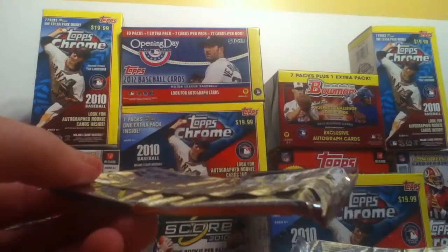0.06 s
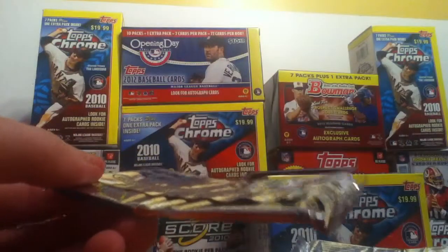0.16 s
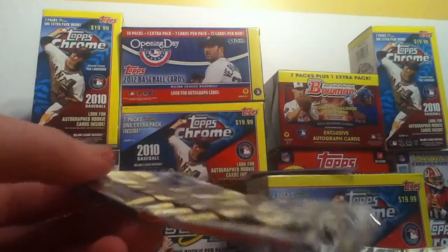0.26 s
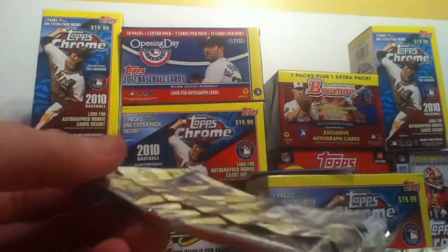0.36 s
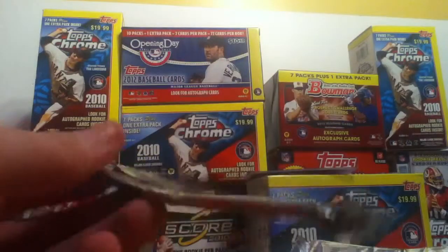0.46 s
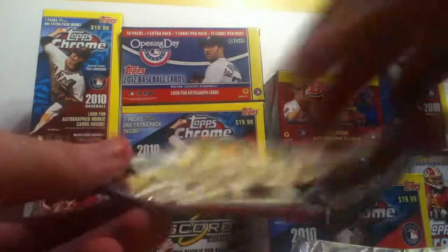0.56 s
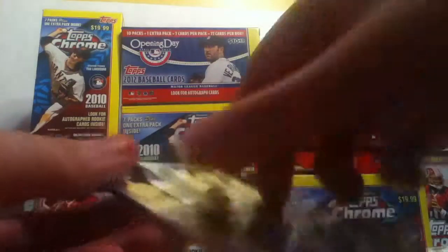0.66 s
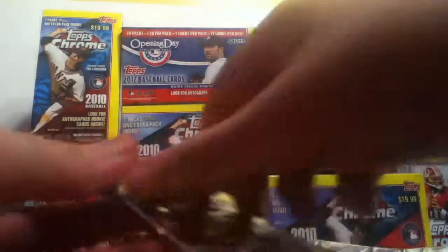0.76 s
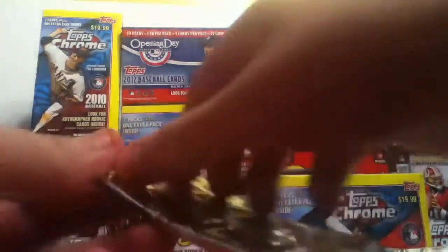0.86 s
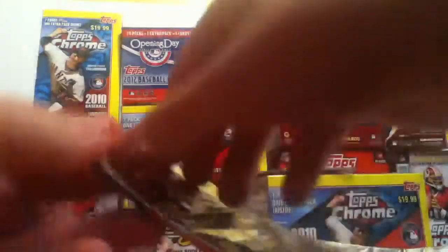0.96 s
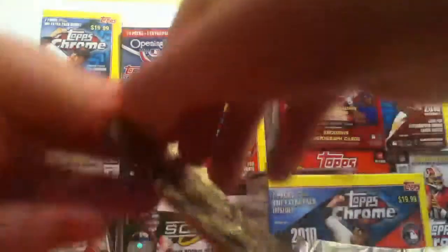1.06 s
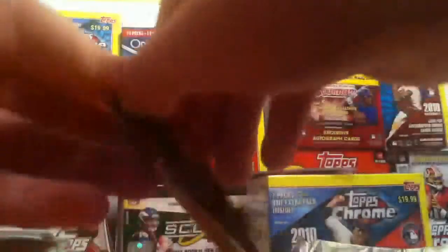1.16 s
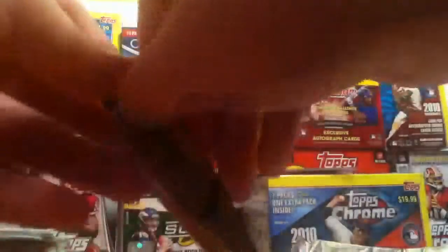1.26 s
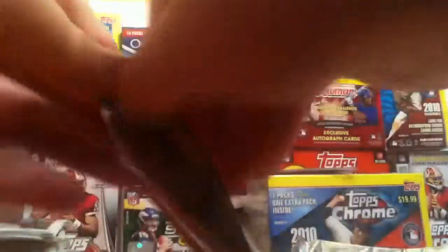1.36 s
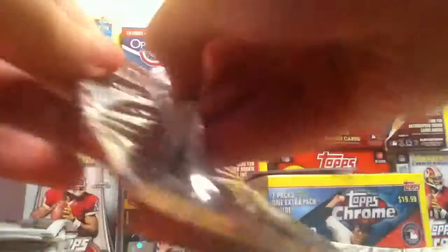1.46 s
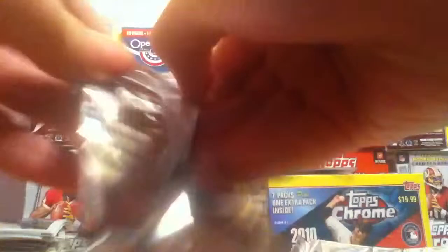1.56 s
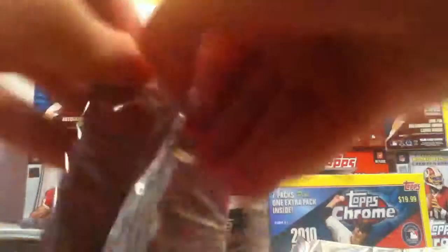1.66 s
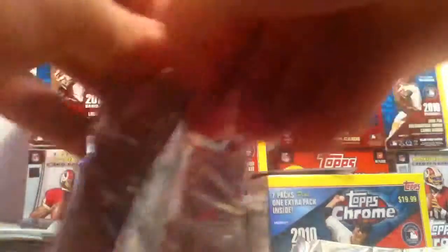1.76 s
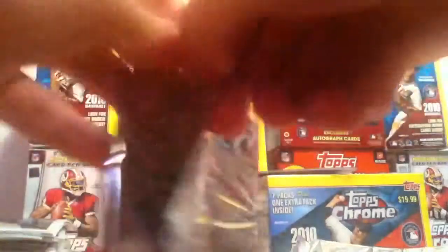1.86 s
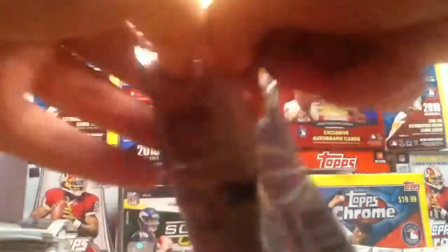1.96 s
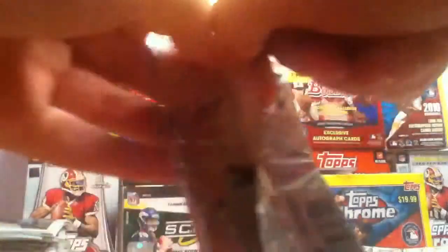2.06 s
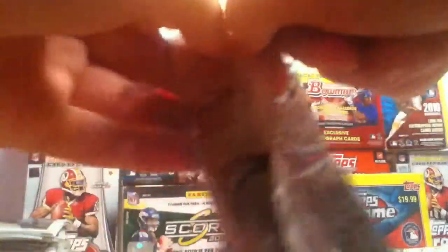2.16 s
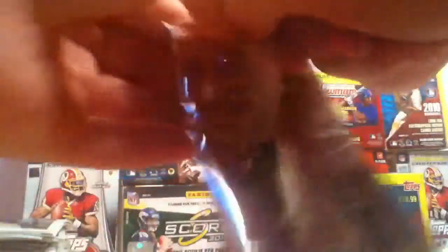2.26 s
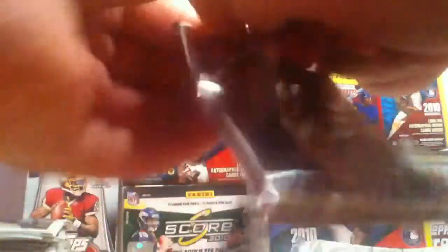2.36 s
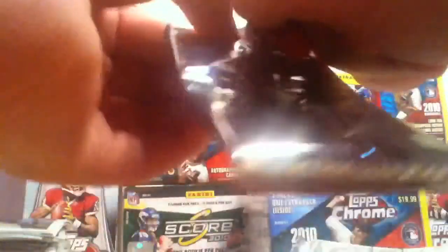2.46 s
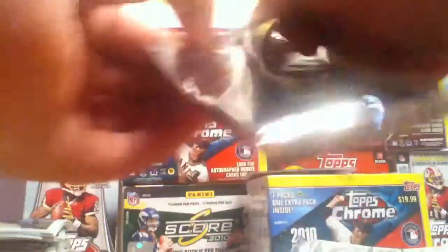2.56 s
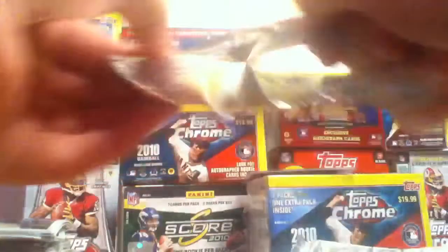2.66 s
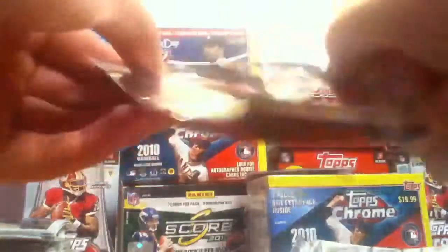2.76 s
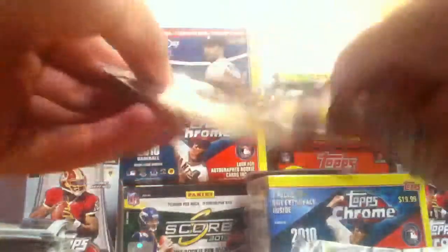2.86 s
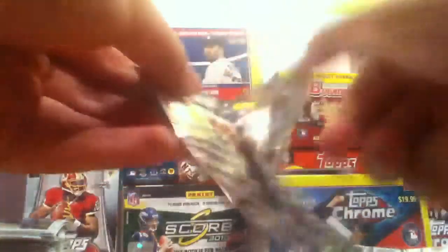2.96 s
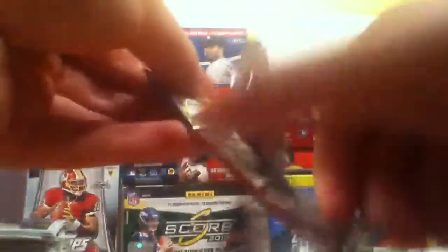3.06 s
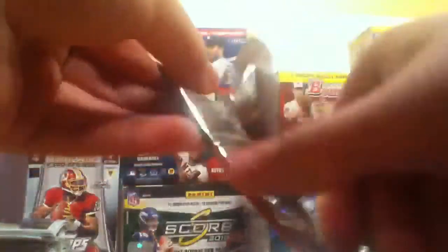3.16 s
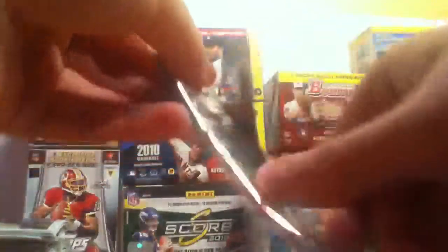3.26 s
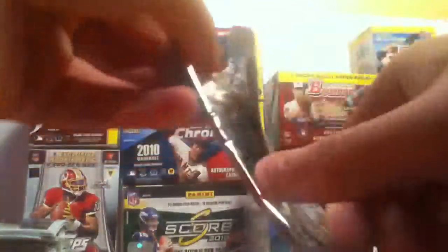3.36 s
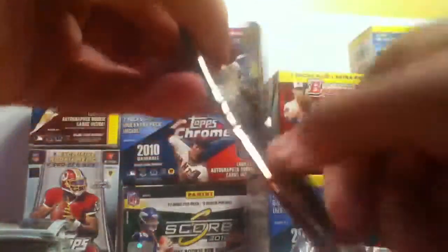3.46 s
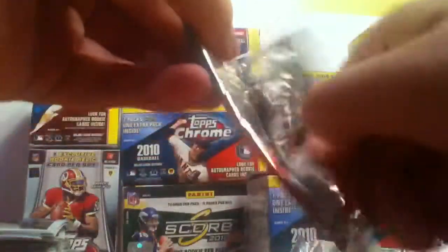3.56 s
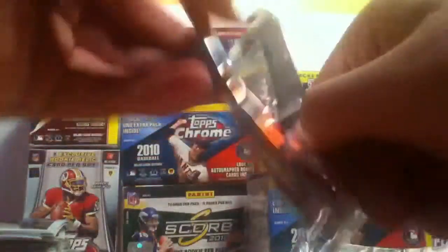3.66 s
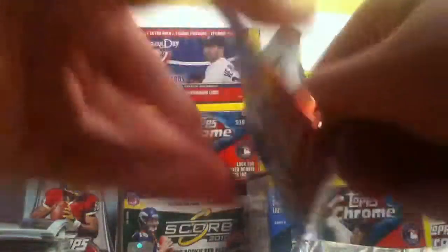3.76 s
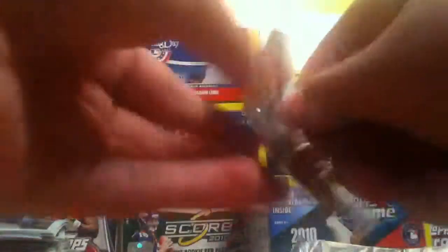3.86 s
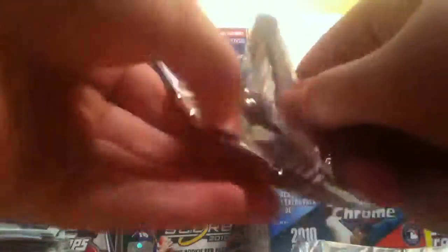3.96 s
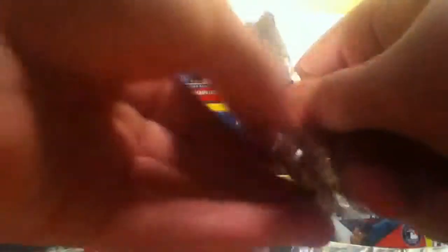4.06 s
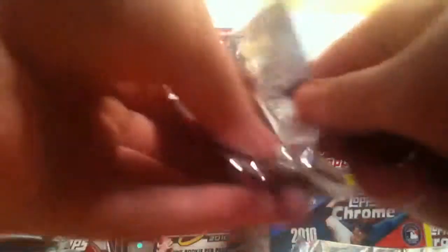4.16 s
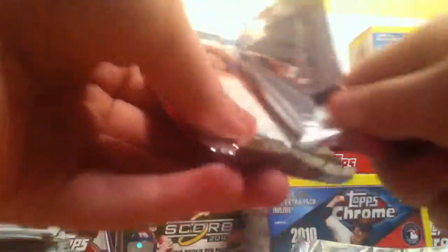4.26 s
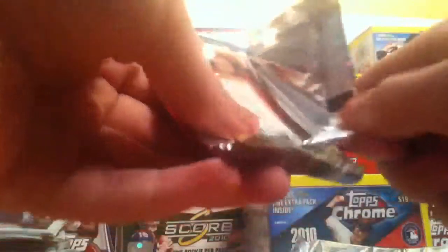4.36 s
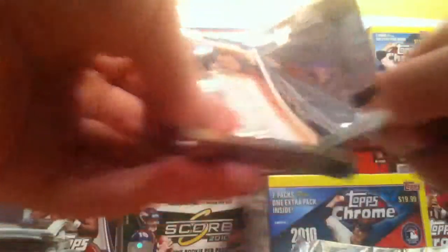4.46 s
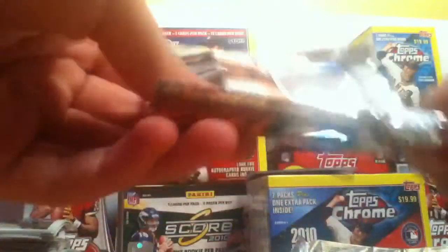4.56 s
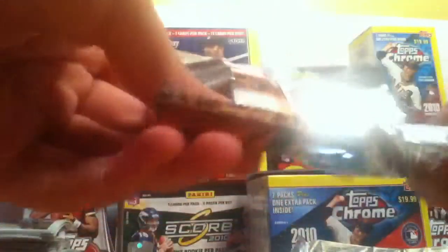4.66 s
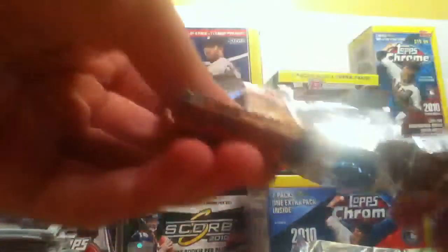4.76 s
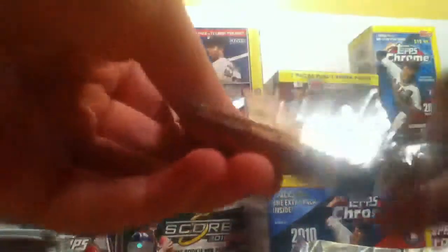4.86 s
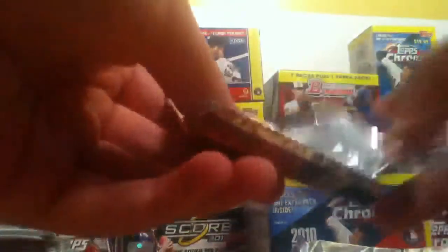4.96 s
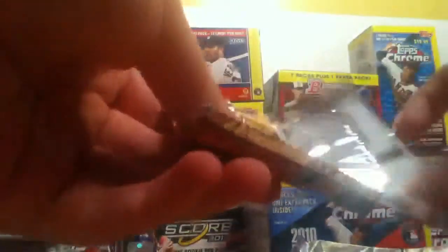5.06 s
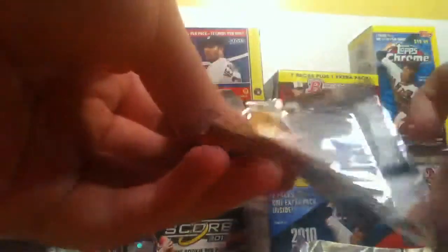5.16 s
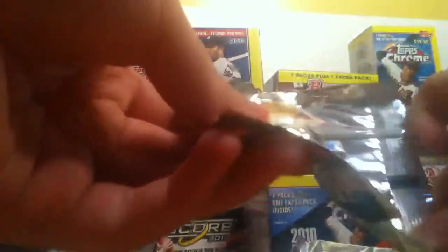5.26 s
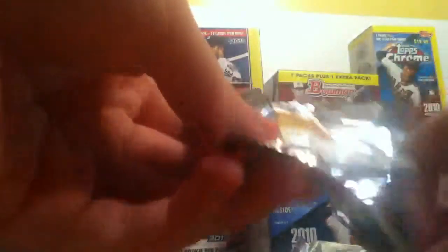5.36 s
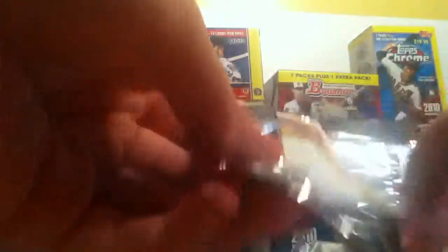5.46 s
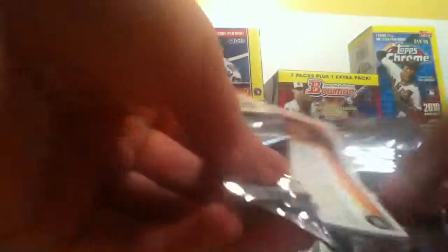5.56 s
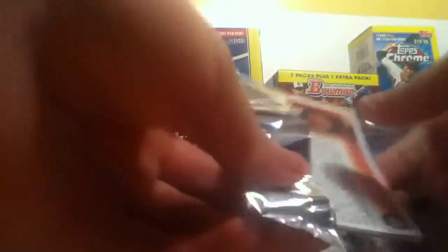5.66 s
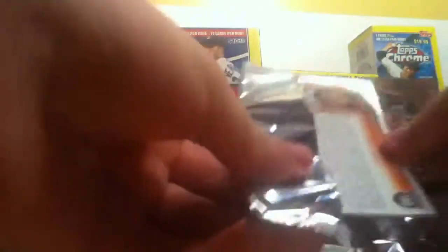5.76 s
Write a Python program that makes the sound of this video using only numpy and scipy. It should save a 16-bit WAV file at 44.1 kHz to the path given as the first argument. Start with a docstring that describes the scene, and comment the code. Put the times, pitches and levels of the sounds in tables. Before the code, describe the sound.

A foil wrapper around a pack of cards is torn open and crumpled by hand, very near the microphone. It starts with scattered small ticks, then several loud flurries of crisp snaps follow, with fine crinkling between them. The last crackles are softer and sparser. The sound is dry and close, with only a low rumble and faint hiss of a quiet room behind it.

```python
"""A quiet room's low rumble, then sharp crackling close to the microphone of a small camera:
two hands tear open and crumple a foil pack of cards. Every crease that buckles gives a tick,
rings its patch of foil for a few cycles and knocks the pack; countless small creases crackle
in between. The camera's automatic gain control ducks at the loudest cracks."""
import sys
import numpy as np
from scipy import signal
from scipy.fft import rfft, irfft
from scipy.io import wavfile
from scipy.ndimage import uniform_filter1d

SR = 44100
rng = np.random.default_rng(int(sys.argv[2]) if len(sys.argv) > 2 else 0)


def unload_audio(sound):
    """Save the sound as a 16-bit wav file, at the path given as the first command line argument."""
    columns = np.transpose(np.atleast_2d(sound))
    # keep every value between -1 and 1, then stretch to whole-number steps
    steps = np.round(np.clip(columns, -1, 1) * 32767)
    wavfile.write(sys.argv[1], SR, steps.astype(np.int16))


N = 255780


def snaps():
    """The loud creases, buckling one by one at close range; taut foil ticks brighter."""
    # loud creases: (time [s], level [dB], patch pitch [Hz], knock on the pack [dB re level])
    loud_creases = [(0.6862, -29, 2400, -7), (0.6909, -21.5, 4734, -12), (0.7342, -17, 4880, -24),
                    (0.7402, -19.5, 5520, -28), (0.8742, -26.5, 3880, -10), (0.8898, -25, 3145, -18),
                    (1.189, -28, 4500, -8), (1.2117, -27.5, 4600, -13), (1.2782, -25, 880, -17),
                    (1.3037, -24, 4693, -19), (1.3162, -17.5, 4400, -26.5), (1.321, -31, 446, -24),
                    (1.3759, -18.5, 7000, -8.5), (1.3808, -19.5, 5530, -16), (1.4854, -21.5, 5094, -14),
                    (1.5036, -10, 4893, -32), (1.5198, -2.5, 4890, -37), (1.5273, 0, 4924, -33),
                    (1.5346, -9.5, 4365, -27), (1.5396, -5, 4600, -29), (1.554, -10.5, 4030, -3.5),
                    (1.571, -10, 5106, -20), (1.5858, -14, 5145, -9.5), (1.6099, -19.5, 3615, 2),
                    (1.631, -20, 3990, -15), (1.643, -15, 4926, -6), (1.712, -15, 5460, -18),
                    (1.7265, -11.5, 5800, -18), (1.7293, -10, 4947, -21), (1.7429, -4.5, 3590, -17.5),
                    (1.7473, -5.5, 5294, -38), (1.7705, -12, 5374, -25), (1.7744, -12, 4500, -19),
                    (1.7961, -15.5, 6130, -22), (1.8337, -23, 5347, -22), (1.8384, -22.5, 5188, -22),
                    (1.8572, -20.5, 4957, -18), (2.0222, -16, 5100, -15), (2.0314, -20, 5250, -18),
                    (2.0485, -18, 5193, -7.5), (2.1688, -13.5, 7235, -26), (2.3105, -9, 5620, -53.5),
                    (2.3197, -11, 5600, -36), (2.323, -13, 4960, -20), (2.3385, -6.5, 5600, -45),
                    (2.3435, -18.5, 5540, -44), (2.373, -37, 5400, -32), (2.3883, -9.5, 5500, -22),
                    (2.3935, -4.5, 5240, -35), (2.4495, -20.5, 5213, -7), (2.4799, -6.5, 4700, -6.5),
                    (2.4909, -5, 6006, -29), (2.5042, -6, 5120, -29), (2.5198, -8, 9300, -30.5),
                    (2.5286, -7.5, 5115, -13.5), (2.536, -3.5, 4740, -32), (2.5404, -13, 5160, -34),
                    (2.554, -18, 4250, -31), (2.6133, -8.5, 5785, -25), (2.6177, -10.5, 4970, -11),
                    (2.6365, -18, 5500, -22), (2.6437, -6, 5368, -17), (2.6487, -4, 9050, -18),
                    (2.6519, -4, 6190, -15), (2.6724, -4.5, 5750, -28), (2.6748, -0.5, 5390, -18.5),
                    (2.694, -15, 3440, -14.5), (2.7232, -8, 4350, -9.5), (2.7814, -22, 4627, -28),
                    (2.7892, -6, 4606, -33.5), (2.7963, -6, 5388, -25), (2.8019, -8.5, 4657, -20),
                    (2.8085, -11, 7990, -19), (2.8296, -18, 3610, -14), (3.005, -7.5, 5670, -15),
                    (3.0355, -11, 4703, -12.5), (3.0606, -13.5, 5096, -25), (3.1217, -17.5, 6158, -17),
                    (3.3092, -11, 5854, -10.5), (3.3638, -25, 2323, -6.5), (3.5773, -20, 4753, -22.5),
                    (3.647, -16, 5503, -25), (3.6554, -9, 4313, -16.5), (3.682, -3.5, 5185, -24),
                    (3.6873, -11.5, 2880, 2), (3.8061, -21.5, 2190, 1), (3.8097, -13.5, 2171, -12.5),
                    (3.8899, -21, 2234, -4), (3.9123, -18.5, 4340, -9.5), (3.9189, -13, 4557, -17),
                    (3.9473, -17.5, 5100, -9.5), (3.967, -31.5, 2280, 3), (3.9811, -18.5, 4486, -5.5),
                    (4.0002, -21.5, 1940, -4), (4.0978, -25, 2410, -9), (4.119, -17.5, 6130, -19.5),
                    (4.152, -33, 5000, -8), (4.2009, -11, 5990, -1), (4.2107, -6, 4930, -12),
                    (4.2161, -8.5, 6504, -31.5), (4.2326, -4, 6900, -24), (4.2394, -11, 6234, -18),
                    (4.2536, -15.5, 5940, -12), (4.2888, -14, 2685, -5), (4.302, -12, 5563, -0.5),
                    (4.3124, -5, 5830, -12.5), (4.3172, -8, 4720, -30), (4.3203, -1.5, 6630, -22),
                    (4.3281, -3.5, 6674, -2), (4.37, -17, 5005, -22), (4.3986, -23, 5543, -40),
                    (4.465, -17.5, 7000, -22), (4.4744, -22, 5235, -20.5), (4.5001, -20.5, 4244, -9),
                    (4.5447, -14, 4902, -8.5), (4.5569, -7, 5600, -14.5), (4.5729, -6, 5042, -14),
                    (4.5907, -2.5, 6200, -18), (4.5978, -6, 1732, -27), (4.6012, -8, 5700, -0.5),
                    (4.6015, -38, 770, -20), (4.6044, -3.5, 5556, -26), (4.6087, -10, 6207, -25),
                    (4.6137, -14, 5410, -2), (4.62, -17.5, 4900, -2.5), (4.625, -6, 1020, -6),
                    (4.6262, 1.5, 4756, -9), (4.6404, -1.5, 5440, -10.5), (4.7077, -23, 5060, -8),
                    (5.0723, -28.5, 2500, 0.5), (5.1513, -15, 8390, -24), (5.1692, -21, 5520, -24),
                    (5.1866, -11.5, 7300, -46.5), (5.2495, -27, 3447, 3.5), (5.2749, -15.5, 6150, -6),
                    (5.307, -22.5, 6840, -24), (5.3293, -22, 3340, -8), (5.342, -14.5, 3430, -6.5),
                    (5.477, -30, 2290, 0), (5.5173, -18.5, 2197, 2.5), (5.7556, -21, 3570, -5),
                    (5.7938, -16, 5940, -7)]
    times, db, hz, knock_db = np.transpose(loud_creases)
    tick_db = by_tautness(times, slack_db=-5, taut_db=8) + 3.5 * rng.standard_normal(len(times))
    return creases(times, db, hz, tick_db, knock_db, ring_t60=0.0055, tick_t60=0.008, knock_t60=0.02)


def crackle():
    """Small creases at random moments, as strong as the hands squeeze; most are faint, a few stand out."""
    # squeezes and rips, each a swarm of small creases: (centre time [s], half length [s], level [dB])
    crumples = [(0.737, 0.0092, -37.5), (1.229, 0.046, -49.5), (1.316, 0.012, -41), (1.534, 0.016, -33.5),
                (1.561, 0.0284, -34.5), (1.697, 0.00966, -40), (1.765, 0.033, -31.5),
                (1.857, 0.0365, -45.5), (2.031, 0.018, -41.5), (2.348, 0.00672, -41.5),
                (2.486, 0.0071, -24.5), (2.525, 0.027, -30.5), (2.671, 0.021, -25.5), (2.742, 0.034, -32),
                (2.786, 0.015, -25), (2.83, 0.01546, -38), (3.049, 0.06, -44.5), (3.252, 0.022, -43.5),
                (3.355, 0.0279, -45.5), (3.574, 0.01225, -42), (3.673, 0.018, -29.5), (3.801, 0.018, -37.5),
                (3.92, 0.018, -41), (3.99, 0.01985, -44), (4.127, 0.0152, -39), (4.22, 0.0172, -32),
                (4.27, 0.01805, -38), (4.314, 0.017, -26), (4.372, 0.02097, -35.5), (4.612, 0.036, -28),
                (4.695, 0.029, -43), (5.172, 0.0292, -43.5), (5.279, 0.021, -43.5), (5.346, 0.0235, -40),
                (5.532, 0.0388, -44), (5.794, 0.054, -46)]
    # faint crackle while fingers hold the foil, livelier once it hangs loose: (time [s], level [dB])
    fidget = [(.6, -67), (1.9, -56), (3.5, -61), (4.05, -51), (4.9, -52), (5.8, -58)]
    start_s, max_per_s, densest_db, centre_hz = .6, 2200, -36, 5360
    span = N / SR - start_s
    when, size, pitch, edge, depth, chance = rng.random((int(max_per_s * span), 6)).T
    times = start_s + when * span
    centre, half, level_db = np.transpose(crumples)
    squeeze_power = (undb(level_db) / (1 + ((times[:, None] - centre) / half) ** 4)) ** 2
    flicker_db = 1.6 * walk(rate=25)[(times * SR).astype(int)]
    fidget_power = undb(np.interp(times, *np.transpose(fidget)) + flicker_db) ** 2
    power = squeeze_power.sum(axis=1) + fidget_power
    squeeze_knock = undb(by_tautness(centre, slack_db=-1.5, taut_db=-10))  # taut foil knocks less
    knock_power = squeeze_power @ squeeze_knock ** 2 + fidget_power * undb(-2) ** 2
    # a light touch sets off fewer creases, which then stand apart
    share = np.clip(np.sqrt(power) / undb(densest_db), .13, 1)
    buckles = chance < share
    accent_db = np.minimum(-4.2 * np.log(1 - size), 14.)
    db = 10 * np.log10(power / share) - 0.6 + accent_db
    hz = centre_hz * np.exp(0.8 * (pitch - .5))
    tick_db = -8 + 22 * (edge - .5)
    knock_db = 10 * np.log10(knock_power / power) - 10.5 + 28 * (depth - .5)
    return creases(times[buckles], db[buckles], hz[buckles], tick_db[buckles], knock_db[buckles],
                   ring_t60=0.0042, tick_t60=0.0018, knock_t60=0.014)


def creases(times, db, hz, tick_db, knock_db, ring_t60, tick_t60, knock_t60):
    """Each buckling crease: a ringing patch, a dry crack with a bright edge and a push on the pack."""
    # resonances of the pack of cards: (frequency [Hz], width [Hz], relative level [dB])
    pack_modes = [(290, 148, -10.5), (615, 152.3, -4.5), (774, 145, -7.5), (1105, 920, -5.5),
                  (1638, 198, -5.5), (2280, 610, -13.5)]
    patch_hz, soft_below_hz = 4950, 1560
    t = np.arange(300) / SR
    length, side, noise, shove = np.split(rng.standard_normal((len(times), 602)), [1, 2, 302], axis=1)
    # each crease sits elsewhere and favours other modes
    place_db = 4.24 * rng.standard_normal((len(times), len(pack_modes)))
    size = undb(db)[:, None]
    rise = 1 - np.exp(-t / .0001)
    # broad, low patches pop softly and ring longer
    breadth = np.sqrt(patch_hz / hz)[:, None]
    sharpness = size * np.minimum(hz / soft_below_hz, 1)[:, None] ** 2
    patch = np.sin(2 * np.pi * hz[:, None] * t) * np.sign(side)
    ring = scatter(times, size * rise * fade(t, ring_t60 * breadth * np.exp(length / 7)) * patch)
    # the jump of the crease, then the rattle of the wrinkles around it
    burst = shaped_noise(noise, rise * (fade(t, tick_t60) + 0.21 * fade(t, 0.033)))
    edge = shaped_noise(noise, rise * (fade(t, 0.00098) + 0.038 * fade(t, 0.017)))
    bursts = scatter(times, sharpness * burst)
    crack = band(band(bursts, hz=5740, width=5650), hz=6620, width=5200)
    edges = scatter(times, sharpness * undb(tick_db)[:, None] * edge)
    tick = signal.sosfilt(signal.butter(3, [6800, 12900], "band", fs=SR, output="sos"), edges)
    push = size * undb(knock_db)[:, None] * shaped_noise(shove, rise * fade(t, knock_t60))
    knock = sum(band(scatter(times, push * undb(mode_db + place)[:, None]), mode_hz, width)
                for (mode_hz, width, mode_db), place in zip(pack_modes, place_db.T))
    foil = 1.03 * ring + 1.11 * crack + 2.7 * tick + 4.03 * knock
    # the microphone rolls off the very top of the foil's crackle
    return signal.lfilter([.2, .6, .2], [1], foil)


def by_tautness(times, slack_db, taut_db):
    """A level that moves from its slack to its taut value as the foil is stretched."""
    # stretch of the foil, peaking as the seam is pulled apart: (time [s], tautness [0-1])
    tautness = [(.6, 0.79), (1.25, 0.64), (1.52, 0.27), (1.6, 0.33), (1.77, 0.83), (2.05, 0.32),
                (2.33, 0.94), (2.66, 0.68), (2.74, 0.39), (2.8, 0.66), (3.05, 0.05), (3.6, 0.64), (4.0, .0),
                (4.2, 0.22), (4.6, 0), (5.15, 0.3), (5.5, 0)]
    return slack_db + (taut_db - slack_db) * np.interp(times, *np.transpose(tautness))


def echoes(x):
    """The close, direct sound plus a faint, dull tail back from the walls."""
    t = np.arange(SR // 4) / SR
    tail = undb(-52.5) * fade(t, t60=0.65) * (t > .004) * rng.standard_normal(len(t))
    dull_tail = signal.lfilter([.6], [1, -.4], tail)
    return x + signal.fftconvolve(x, dull_tail)[:N]


def room_tone():
    """Rumble that the room's lowest modes colour, under a smooth hiss; the modes swell and sink."""
    # noise floor of the room: (frequency [Hz], level [dB per Hz])
    noise_floor = [(30, -89.5), (60, -87), (85, -83), (140, -80), (200, -76.5), (300, -79.5), (450, -86),
                   (650, -83.5), (1000, -87.5), (1500, -93.5), (3300, -95), (13000, -106), (16000, -111)]
    # lowest room modes: (frequency [Hz], width [Hz], boost [dB])
    room_modes = [(88.6, 7.3, 15), (126.7, 12, 3.5), (135.3, 18, 10.5)]
    floor_hz, floor_db = np.transpose(noise_floor)
    freqs = np.arange(1, N // 2 + 2) * SR / N
    spectrum = undb(np.interp(np.log(freqs), np.log(floor_hz), floor_db))
    air = irfft(rfft(rng.standard_normal(N)) * spectrum, N) * np.sqrt(SR / 2)
    return air + sum(undb(db + 5 * walk(rate=3.125)) * band(air, hz, width) for hz, width, db in room_modes)


def undb(db):
    """Decibels to gain."""
    return 10 ** (np.asarray(db) / 20)


def fade(t, t60):
    """Exponential decay, 60 dB down after t60 seconds."""
    return np.exp(-np.log(1000) * t / t60)


def band(x, hz, width):
    """Resonance with gain 1 at its centre."""
    return signal.lfilter(*signal.iirpeak(hz, hz / width, fs=SR), x)


def walk(rate):
    """Random levels held 1 / rate s and slewed twice."""
    hold = int(SR / rate)
    steps = np.repeat(rng.standard_normal(N // hold + 1), hold)
    return uniform_filter1d(uniform_filter1d(steps, hold), hold)[:N]


def shaped_noise(noise, shape):
    """Rows of noise under a shape, each row with the energy of the shape itself."""
    rows = noise * shape
    return rows * np.sqrt(np.sum(shape ** 2) / np.sum(rows ** 2, axis=1, keepdims=True))


def scatter(times, grains):
    """Lay each row of grains on the time line at its moment."""
    at = (np.asarray(times) * SR).astype(int)[:, None] + np.arange(grains.shape[1])
    return np.bincount(at.ravel(), grains.ravel(), N + SR)[:N]


def follow(x, attack_s, release_s, block=256):
    """Peak envelope, block by block, that rises fast and sinks slowly."""
    peaks = np.abs(x[:len(x) // block * block]).reshape(-1, block).max(axis=1)
    envelope, level = np.empty(len(peaks)), 0.
    for i, peak in enumerate(peaks):
        level += (peak - level) * block / SR / (attack_s if peak > level else release_s)
        envelope[i] = level
    return np.interp(np.arange(len(x)), (np.arange(len(peaks)) + 1) * block, envelope)


def scene():
    """At the microphone, in mono: foil up close, wall echoes and room tone behind it."""
    return (echoes(snaps() + crackle()) + room_tone())[None]


def record(dry):
    """The camera's gain control turns down at the loudest cracks and recovers slowly; the top is cut."""
    threshold_db, top_hz = -8.5, 16500
    envelope = follow(dry[0], attack_s=0.0042, release_s=1.17)
    gain = np.minimum(undb(threshold_db) / (envelope + 1e-9), 1) ** 0.54
    return signal.sosfilt(signal.ellip(10, .2, 75, top_hz, fs=SR, output="sos"), dry * gain)


dry = scene()
out = record(dry)
unload_audio(out)
```